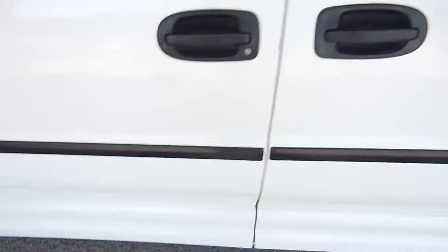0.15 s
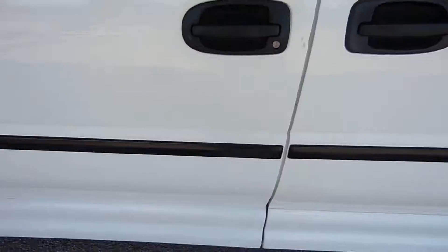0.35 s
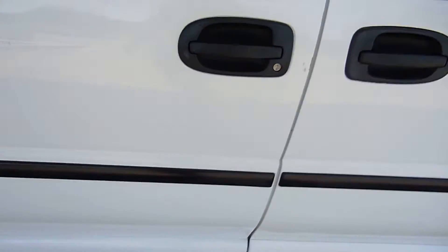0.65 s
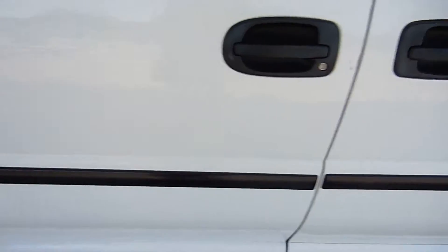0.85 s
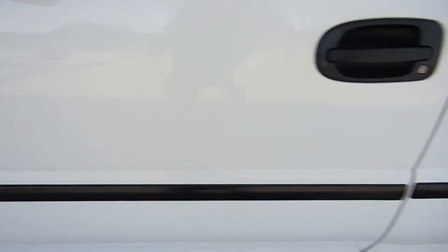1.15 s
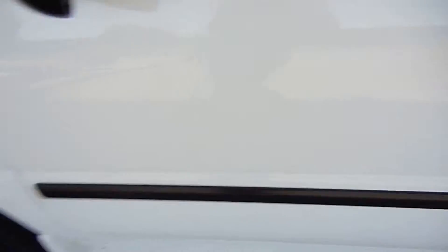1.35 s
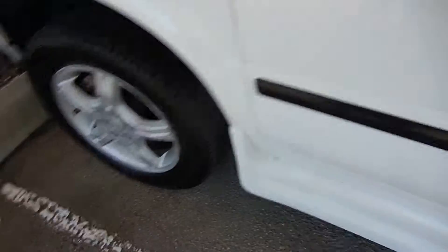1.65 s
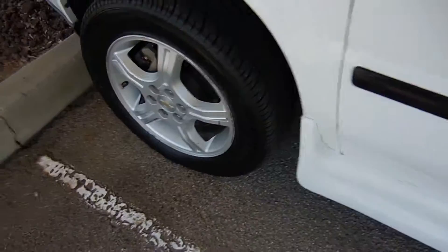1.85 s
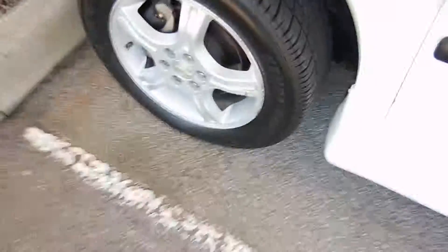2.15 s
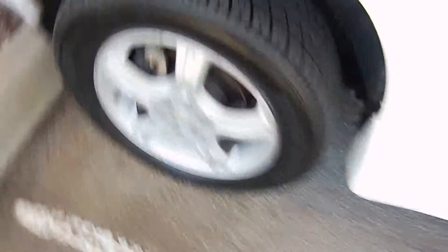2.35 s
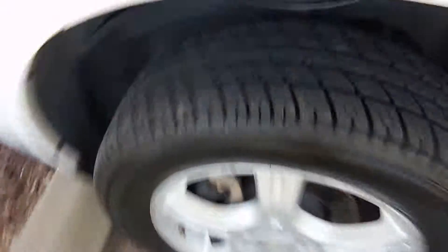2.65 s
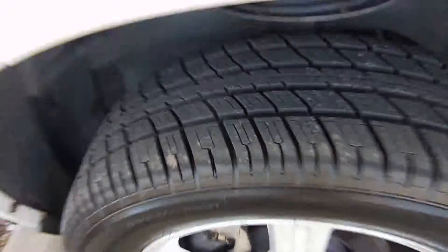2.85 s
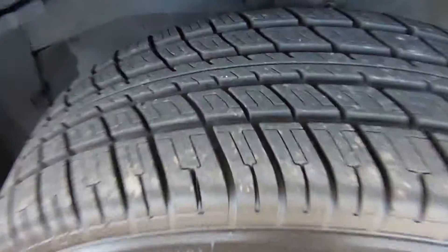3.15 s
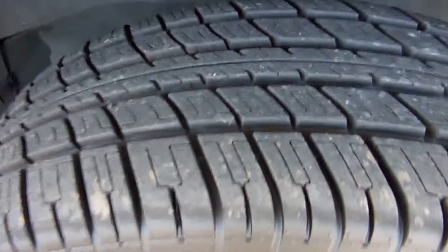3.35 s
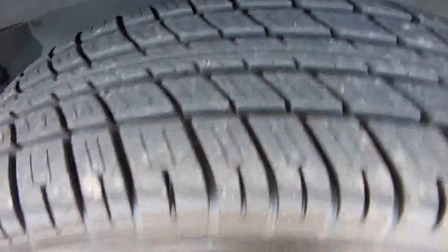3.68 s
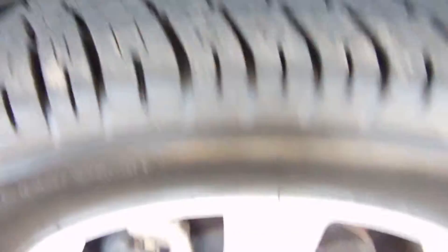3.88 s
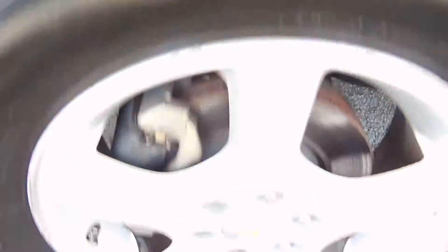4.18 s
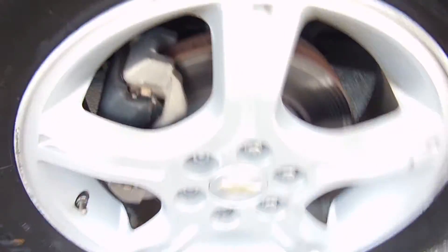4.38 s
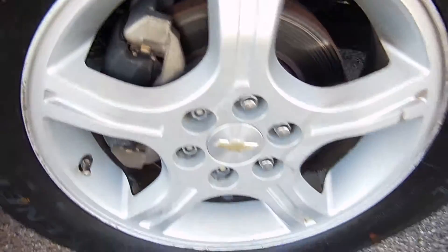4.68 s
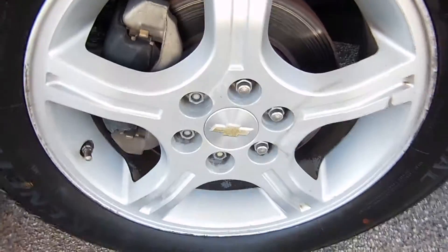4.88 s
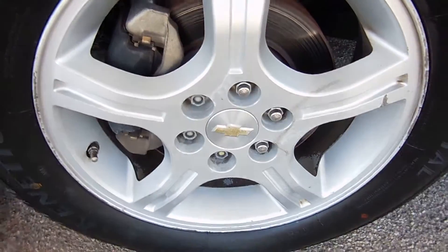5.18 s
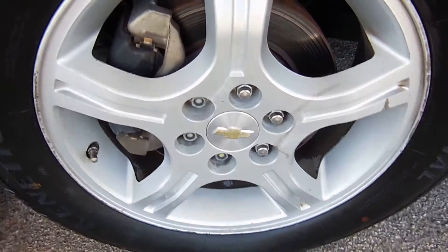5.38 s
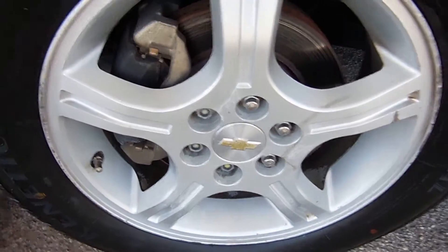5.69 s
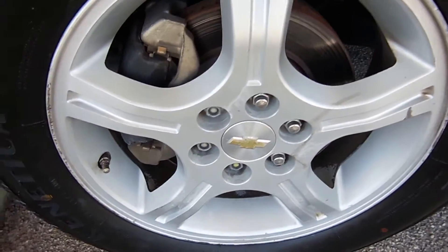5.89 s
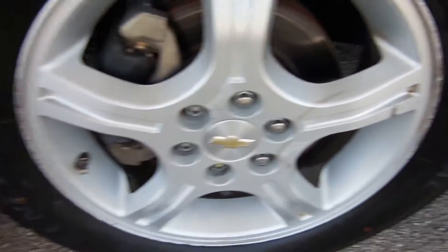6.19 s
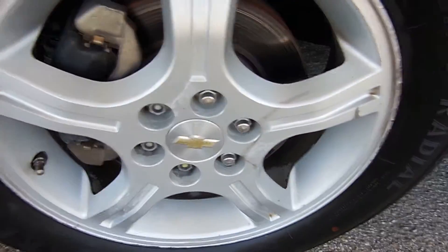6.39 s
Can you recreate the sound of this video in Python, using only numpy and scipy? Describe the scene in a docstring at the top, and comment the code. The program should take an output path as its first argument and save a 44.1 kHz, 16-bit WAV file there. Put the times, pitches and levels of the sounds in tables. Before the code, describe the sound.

Right at the start a van door slams beside a handheld stereo microphone, a distorted boomy thud with metallic latch rattle and a brief outdoor echo. Behind it an engine idles. As the camera moves along the van towards the front wheel, the ticking, hissing engine noise swells, with soft wind puffs and dull handling clacks, then holds steady.

```python
"""Van door slam and a walk around an idling engine

A van door slams beside a hand-held camera and overloads it: shaped noise for the panels and latch, fading
sines for the cabin air. The six-cylinder engine idles as wavering sines over a low rumble. The camera is
carried along the flank, past the wing, down to the wheel arch and in front of the wheel, so the coloured
noise of the engine bay swells and changes. Ringing clacks, scuffs of noise and low puffs of air join in."""
import sys
import numpy as np
from scipy import signal
from scipy.fft import rfft, irfft, next_fast_len
from scipy.io import wavfile
from scipy.ndimage import uniform_filter1d, map_coordinates

SR = 44100
rng = np.random.default_rng(int(sys.argv[2]) if len(sys.argv) > 2 else 0)


def put_to_file(sound):
    """Save the sound as 16-bit audio at rate SR, in the file named by the first command-line argument."""
    columns = np.atleast_2d(sound).T  # one column per channel
    safe = np.clip(columns, -1, 1)
    whole_steps = np.round(safe * 32767)
    wavfile.write(sys.argv[1], SR, whole_steps.astype(np.int16))


N = 287973  # length in samples

# Where the camera is; 0 flank, 1 wing, 2 arch, 3 wheel, blended in between: t/s, place
PLACE = [(0, 0), (1.3, 0), (2.2, 1), (2.7, 1), (3.3, 2), (4.1, 2), (4.7, 3), (6.53, 3)]
# How alike left and right are, 1 the same, 0 unrelated, below 0 opposed: f/Hz, likeness
ALIKE = [(60, 0.85), (130, 1), (290, 1), (640, 0.97), (1410, 0.84), (3100, 0.42), (6820, -0.35),
         (15000, 0.21)]


def door():
    """Each blow shakes the panels, whose treble mostly dies sooner, and jingles the latch; the cabin booms."""
    # Door and latch blows: t/s, rattle level/dB, rattle f/Hz
    blows = [(0.0, -16, 5000), (0.010, 1.5, 10700), (0.022, -1, 5000), (0.030, -5, 9500), (0.038, -8, 8000),
             (0.046, -0.5, 9300), (0.053, -10, 10000), (0.067, -6.5, 7900), (0.0786, -14, 7540),
             (0.091, -20, 9000), (0.101, -8.5, 4630), (0.107, -12, 6200), (0.110, -10.5, 7000)]
    # Pushes of the door on the cabin air: t/s, level/dB
    pushes = [(0.0, -12.5), (0.057, -16), (0.094, -11.5)]
    # Cabin resonances: f/Hz, level/dB, time to fall 60 dB/s
    cabin = [(27.2, -1.5, 0.41), (40, -1, 0.32), (54.5, -6.5, 0.37), (86.2, -0.5, 0.17), (122, -2.5, 0.22),
             (178, 1, 0.16)]
    # Thud colour before scaling: f/Hz, level per Hz/dB
    thud_colour = [(15, -30), (60, 3), (130, -0.5), (250, 0.5), (520, -2.5), (900, -3.5), (2000, -3.5),
                   (3500, -5.5), (6000, -13.5), (12000, -20.5)]
    # Panel resonances: f/Hz, width/Hz, rise/dB
    panels = [(208, 25, 3), (257, 31, 8.5), (420, 35, 4.5), (670, 51, 5), (773, 75, 8.5), (933, 48, 3),
              (1120, 74, 6), (1345, 64, 7.5)]
    # How long each pitch of the thud lasts: f/Hz, time to fall 60 dB/s
    dying = [(30, 0.59), (100, 0.23), (300, 0.33), (1000, 0.12), (3000, 0.078), (10000, 0.083)]
    # Left-right likeness of the door: f/Hz, likeness
    door_alike = [(60, 0.95), (240, 1), (950, 0.95), (3770, 0.63), (15000, 0.39)]
    thud_db, thud_fades_db_per_s = 1, 159  # level at time 0; later thuds are weaker
    jingle_t60_s = 0.02

    out = np.zeros((2, N))
    t = np.arange(SR // 2) / SR
    boom = sum(amp(db - 60 * t / t60) * np.sin(2 * np.pi * hz * t) for hz, db, t60 in cabin)
    for s, db in pushes:
        add(out, s, amp(db) * boom[None])

    for s, rattle_db, rattle_hz in blows:
        shake = rush(rng.standard_normal((2, len(t))), thud_colour, door_alike, panels)
        hz, frame_s, z = signal.stft(shake, SR, nperseg=256)
        # Fade every frequency band at its own speed
        fade = amp(-60 * frame_s / along(dying, hz)[:, None])
        thud = signal.istft(z * fade, SR, nperseg=256)[1][:, :len(t)]
        thud = thud * (1 - np.exp(-t / 0.002))  # soften the first instant

        latch = [(1500, -22), (rattle_hz / 2, -10), (rattle_hz, 0), (rattle_hz * 1.66, -8), (20000, -14)]
        jingle = rush(rng.standard_normal((2, len(t))), latch, door_alike)
        jingle = amp(rattle_db - 60 * t / jingle_t60_s) * jingle
        add(out, s, amp(thud_db - thud_fades_db_per_s * s) * thud + jingle)
    return out


def engine():
    """Low exhaust tones waver over a rumble; two whines follow the same engine speed."""
    # Firing rate of one cylinder bank: t/s, f/Hz
    idle = [(0, 17.4), (2.0, 17.5), (2.8, 17.95), (4.0, 18.2), (5.4, 18.3), (6.53, 18.1)]
    # Exhaust tones: multiple of the firing rate, level before wavering/dB
    exhaust = [(1.33, -49), (2, -54.5), (3, -48), (4, -50.5), (5, -49.5), (6, -59.5), (12, -57)]
    # Rumble colour before scaling: f/Hz, level per Hz/dB
    rumble_colour = [(8.8, -29), (15, -6.5), (87, -7.5), (167, -14.5), (307, -25.5), (350, -36), (460, -52),
                     (770, -120)]

    turns = 2 * np.pi * np.cumsum(curves(idle)[0]) / SR  # phase in radians
    boom = 0
    for k, db in exhaust:
        level = amp(db + 2.6 * wobble(3.05))
        boom = boom + level * np.sin(k * turns + 0.63 * wobble(4.11))

    bay_db, _, upper_db, lower_db, _ = walk()
    upper_level = amp(bay_db + upper_db + 1.8 * wobble(4) + 2 * wobble(25))
    upper = upper_level * np.sin(66.0 * turns + 1.15 * wobble(55) + 1.5 * wobble(12))
    lower_level = amp(bay_db + lower_db + 2.5 * wobble(25))
    lower = lower_level * np.sin(33.9 * turns + 1.4 * wobble(45))

    rumble = rush(rng.standard_normal((2, N)), rumble_colour, ALIKE)
    rumble = amp(-47.5 + 0.73 * wobble(3.8)) * rumble
    return boom + upper + lower + rumble


def bay():
    """Fans, belts and valve gear: ticking noise heard through the colour of each place passed."""
    # Colour of the bay at each place, before scaling: f/Hz, level per Hz/dB
    flank, wing = [(120, -90), (200, -12.5), (338, -12), (394, -12.5), (537, -11.5), (617, -9), (827, -7),
                   (1080, -15), (1260, -5.5), (2090, -14), (2290, -9.5), (3700, -13.5), (8000, -16),
                   (10400, -61), (17600, -120)], [(120, -48), (200, -10), (264, -14), (323, -12.5), (460, -6), (598, -6),
                                  (698, -3.5), (840, -3), (1060, -5), (1160, 0), (1270, -5), (3030, -5.5),
                                  (8000, -12.5), (10400, -45), (17600, -120)]
    arch, wheel = [(120, -34), (200, -21.5), (420, -6.5), (467, -11.5), (608, -6.5), (688, -7),
                   (1010, -5.5), (1090, -8), (1220, -2.5), (1930, -8), (3220, -5.5), (3930, -9),
                   (8000, -14), (10400, -17.5), (17600, -120)], [(120, -43), (200, -20), (285, -17.5), (420, -6), (598, -6.5), (778, -6.5),
                                 (1220, -4), (1310, -5), (1440, -2.5), (2060, -7), (2840, -4), (3810, -8),
                                 (8000, -11), (10400, -83), (17600, -120)]
    # Left-right likeness at each place: f/Hz, likeness
    flank_alike, wing_alike = [(60, 0.96), (150, 0.92), (380, 0.96), (950, 0.91), (2380, 0.22),
                               (5980, -0.4), (15000, 0.3)], [(60, 0.86), (150, 0.9), (380, 0.99), (950, 0.97),
                                                    (2380, 0.8), (5980, 0.23), (15000, -0.28)]
    arch_alike, wheel_alike = [(60, 0.97), (150, 0.94), (380, 1), (950, 0.83), (2380, 0.36), (5980, -0.32),
                               (15000, 0.16)], [(60, 0.97), (150, 0.93), (380, 1), (950, 0.9),
                                                   (2380, 0.65), (5980, -0.27), (15000, -0.019)]
    # Hollows that ring, one list for each place: f/Hz, width/Hz, rise/dB
    hollows = [
        [(1060, 120, 9.5), (2226, 30, 6)],
        [(860, 48, 5), (2710, 23, 7), (3120, 72, 5.5)],
        [(1024, 21, 7), (1660, 20, -4), (2330, 35, 6.5), (2820, 40, 5), (3200, 37, 5), (3360, 31, 6.5)],
        [(1102, 23, 8), (1447, 30, 6.5), (1710, 24, 1), (1890, 10, 9.5), (2500, 45, 8), (2800, 31, 4.5),
         (3270, 43, 8), (4200, 43, 2), (4630, 30, 8.5), (6000, 27, 9.5), (7330, 35, 2)],
    ]
    # Colour of the treble hiss before scaling: f/Hz, level per Hz/dB
    hiss_colour = [(2350, -11.5), (4000, -5.5), (6480, -6.5), (7340, -4), (8710, -4.5), (11100, -4),
                   (15100, -7.5), (15500, -4.5)]

    bay_db, hiss_db, _, _, pan_db = walk()
    place = curves(PLACE)[0]
    stir = churn(patchy_db=0.94, tick_rate=200, tick_db=7.5)
    fizz = churn(patchy_db=0.9, tick_rate=91, tick_db=13)
    colours = [flank, wing, arch, wheel]
    likenesses = [flank_alike, wing_alike, arch_alike, wheel_alike]
    body, hiss = 0, 0
    for k, (colour, alike) in enumerate(zip(colours, likenesses)):
        share = np.clip(1 - abs(place - k), 0, 1)  # 1 at the place, 0 at its neighbours
        body = body + share * rush(stir, colour, alike, hollows[k])
        hiss = hiss + share * rush(fizz, hiss_colour, alike, hollows[k])

    flutter_db = 0.25 * wobble(8) + 0.4 * wobble(30)
    sides = amp(np.array([pan_db, -pan_db]) / 2)
    return amp(bay_db + flutter_db) * (sides * body + amp(hiss_db) * hiss)


def churn(patchy_db, tick_rate, tick_db):
    """Two noises with patches of random gain and sparse valve-gear ticks (tick_rate a second on average)."""
    z = signal.stft(rng.standard_normal((2, N)), nperseg=512)[2]
    # Smooth random gains over frequency, then over time
    field = uniform_filter1d(rng.standard_normal(z.shape[1:]), size=6, axis=0)
    field = uniform_filter1d(field, size=8, axis=1)
    noise = signal.istft(z * amp(patchy_db * unit(field)), nperseg=512)[1][:, :N]
    ticks = (rng.random(N) < tick_rate / SR) * amp(tick_db + rng.normal(0, 2.1, N))
    return noise + ticks * rng.standard_normal((2, N))


def walk():
    """The bay level, then hiss, upper whine, lower whine and left-right lean along the path, in dB."""
    # Level of the bay on the way: t/s, level/dB
    nearness = [(1.04, -37.5), (1.61, -35), (2.45, -30), (2.76, -30.5), (3.32, -27), (3.85, -25),
                (4.41, -26.5), (4.88, -27), (6.5, -27.5)]
    # One row a place: hiss over bay/dB, upper whine over bay/dB, lower whine over bay/dB, left over right/dB
    heard = [(-2.5, -8.5, -14, 1), (-1.5, -9, -15, 0.5), (-0.5, -9.5, -13.5, -0.5),
             (-1.15, -12.5, -18.5, 0.5)]
    place = curves(PLACE)[0]
    blended = [np.interp(place, range(len(heard)), column) for column in np.transpose(heard)]
    return curves(nearness)[0], *blended


def clacks():
    """Short dull rings with a snap of noise; gritty scrapes of noise lie under the clusters."""
    # Clacks: t/s, ring level before its onset/dB, ring f/Hz, ring time to fall 60 dB/s, snap level/dB
    hits = [(1.390, -19, 3580, 0.0055, -28), (2.5445, -18, 2600, 0.0066, -14),
            (2.861, -9.5, 890, 0.013, -26), (2.867, -14, 950, 0.013, -17), (2.879, -5, 1400, 0.0088, -19),
            (2.887, -14, 1280, 0.014, -30), (2.954, -12, 990, 0.0069, -14),
            (4.323, -12.5, 2330, 0.025, -29), (4.337, -14, 2580, .013, -32), (4.386, -16, 2980, .016, -31),
            (4.392, -11, 1080, 0.016, -27), (4.398, -15, 2160, 0.013, -21), (4.405, -8.5, 2090, 0.014, -23),
            (4.411, -10, 2060, 0.019, -21), (4.431, -12, 2040, 0.021, -32),
            (4.441, -9.5, 2060, 0.0093, -17)]
    # Scrapes: t of peak/s, level before wavering/dB, time to rise 30 dB/s, time to fall 60 dB/s
    scrapes = [(2.866, -24, 0.01, 0.2), (4.33, -22, .015, 0.075), (4.388, -16.5, 0.044, 0.35)]
    # Scrape colour before scaling: f/Hz, level per Hz/dB
    grit = [(180, -45), (300, -20.5), (1260, -5.5), (1640, -14), (2210, -7.5), (3690, -10.5), (15500, -18)]
    # Snap colour before scaling: f/Hz, level per Hz/dB
    snap_colour = [(300, -16), (1200, 5), (3000, -2), (5000, -7), (12000, -6), (16000, -12)]
    snap_t60_s = 0.0098

    out = np.zeros((2, N))
    t = np.arange(SR // 8) / SR
    for s, db, hz, t60, snap_db in hits:
        ring = np.sin(2 * np.pi * hz * t) + 0.1 * np.sin(2 * np.pi * 1.3 * hz * t)
        ring = amp(db - 60 * t / t60) * ring * (1 - np.exp(-30 * t / t60))
        snap = rush(rng.standard_normal((2, len(t))), snap_colour, ALIKE)
        add(out, s, ring + amp(snap_db - 60 * t / snap_t60_s) * snap)

    now = np.arange(N) / SR
    for s, db, rise, t60 in scrapes:
        swell_db = np.where(now < s, 30 * (now - s) / rise, -60 * (now - s) / t60)
        scrape = rush(rng.standard_normal((2, N)), grit, ALIKE)
        out += amp(db + swell_db + 1.84 * wobble(400)) * scrape
    return out


def echoes(x):
    """The surroundings answer: a fading noise tail, alike in both ports at low pitch, less so in the treble."""
    # What parked cars and kerbs send back, before scaling: f/Hz, level/dB
    lot = [(200, -3), (700, -4), (3000, 1), (8000, -3), (16000, -18)]
    t = np.arange(SR // 2) / SR
    tail = rush(rng.standard_normal((2, len(t))), lot, ALIKE)
    tail = tail * amp(-60 * t / 0.38) * (t > 0.012)  # falls 60 dB in 0.38 s, silent for the first 12 ms
    return signal.fftconvolve(x.mean(0)[None], tail / np.linalg.norm(tail[0]), axes=1)[:, :N]


def buffet():
    """Air on the microphone ports as the camera swings: low noise that swells and fades, unlike in each."""
    peak_s, level_db = 1.62, -42.5  # level before wavering
    rise_s, fall_s = 0.3, 2.2  # each over 60 dB
    colour = [(15, -20), (40, 3), (140, -3), (350, -21), (900, -60)]
    puffs = rush(rng.standard_normal((2, N)), colour, [(100, 0.24)])
    after = np.arange(N) / SR - peak_s
    swell_db = np.where(after < 0, 60 * after / rise_s, -60 * after / fall_s)
    return amp(level_db + swell_db + 1.9 * wobble(25)) * puffs


def amp(db):
    """Decibels to gain."""
    return 10 ** (np.asarray(db) / 20)


def unit(x):
    """Scales to an average strength (rms) of 1."""
    return x / np.sqrt(np.mean(x ** 2) + 1e-20)


def along(points, hz):
    """Reads a curve of (Hz, value) points, on a log frequency axis."""
    f, v = np.transpose(points)
    return np.interp(np.log(hz + 1), np.log(f + 1), v)


def curves(rows):
    """One value per sample for each column after the time."""
    s, *cols = np.transpose(rows)
    return [np.interp(np.arange(N) / SR, s, c) for c in cols]


def wobble(rate):
    """A smooth random curve through rate random points a second."""
    knots = rng.standard_normal(int(N * rate / SR) + 4)
    return map_coordinates(knots, [np.arange(N) * rate / SR])


def filtered(x, response):
    """Multiplies the spectrum of x by a gain that depends on frequency."""
    m = next_fast_len(x.shape[-1] + 8192)
    spectrum = rfft(x, m) * response(np.fft.rfftfreq(m, 1 / SR))
    return irfft(spectrum, m)[..., :x.shape[-1]]


def rush(pair, spectrum, alike, rings=()):
    """Colours two unrelated noises and spreads them into stereo of rms 1, as alike as asked."""
    def colour(hz):
        """Gains of the part both sides share and of the part that differs."""
        db = along(spectrum, hz)
        for centre, width, rise in rings:
            db = db + rise / (1 + (2 * (hz - centre) / width) ** 2)
        # The cosine of twice this angle is the left-right likeness
        turn = np.arccos(np.clip(along(alike, hz), -1, 1)) / 2
        return amp(db) * [np.cos(turn), np.sin(turn)]
    mid, side = filtered(pair, colour)
    return unit(np.array([mid + side, mid - side]))


def add(out, s, sound):
    """Mixes a sound in at time s."""
    i = round(s * SR)
    out[:, i:i + sound.shape[1]] += sound


def scene():
    """Door with its echoes, engine, bay, air on the ports and clacks together."""
    slam = door()
    return slam + amp(-19.5) * echoes(slam) + engine() + bay() + buffet() + clacks()


def record(dry):
    """The two ports differ a little, the input stage flattens loud peaks, a sharp filter cuts the top."""
    # Difference between the microphone ports: f/Hz, left over right/dB
    lean = [(60, 0), (240, -1), (950, -1.5), (3770, -2), (15000, 0)]
    ceiling, top_hz = 0.82, 15720
    ports = filtered(dry, lambda hz: amp(along(lean, hz) / 2 * [[1], [-1]]))
    flattened = ports / (1 + abs(ports / ceiling) ** 6) ** (1 / 6)
    return filtered(flattened, lambda hz: hz < top_hz)


dry = scene()
out = record(dry)
put_to_file(out)
```